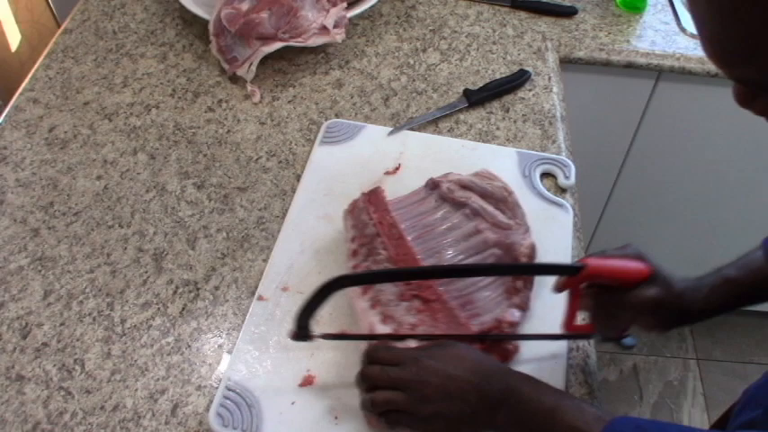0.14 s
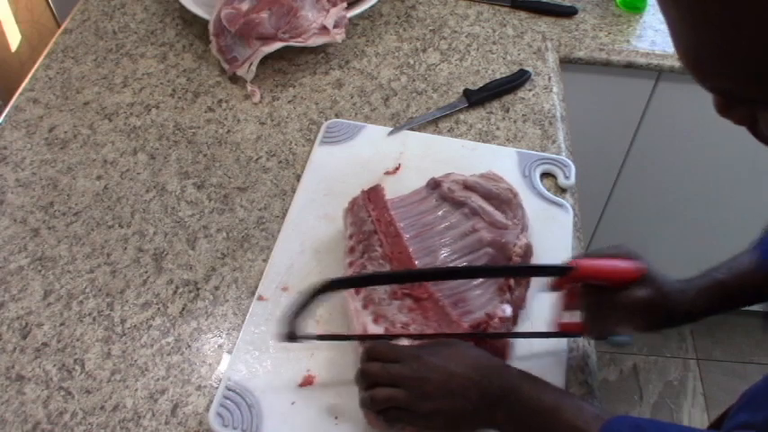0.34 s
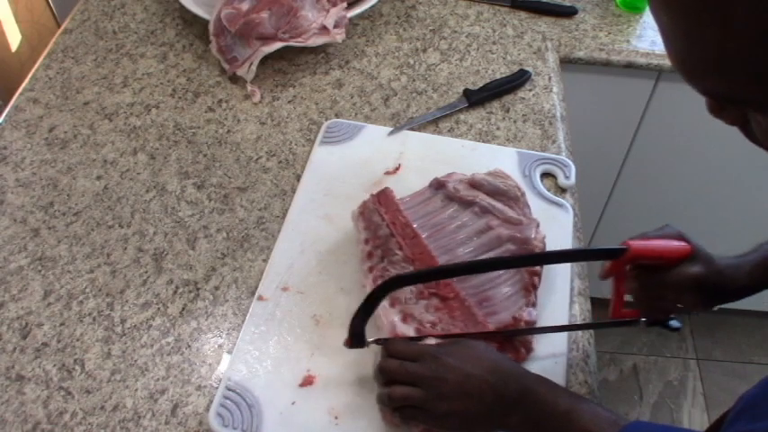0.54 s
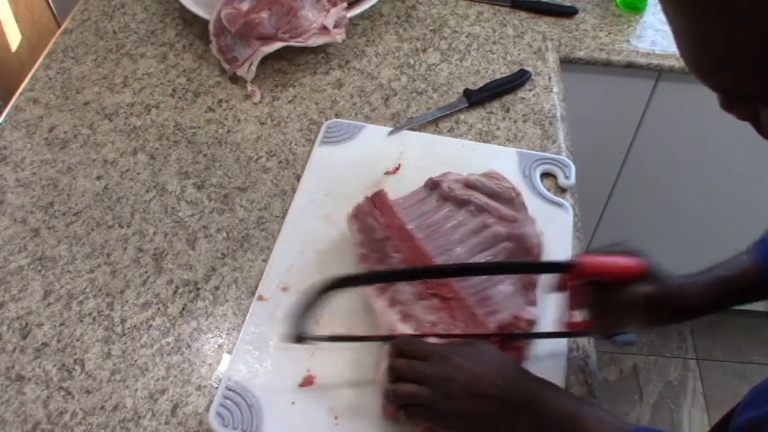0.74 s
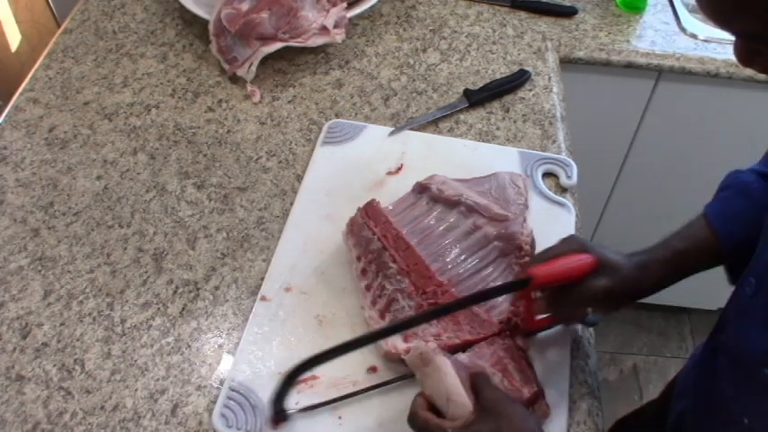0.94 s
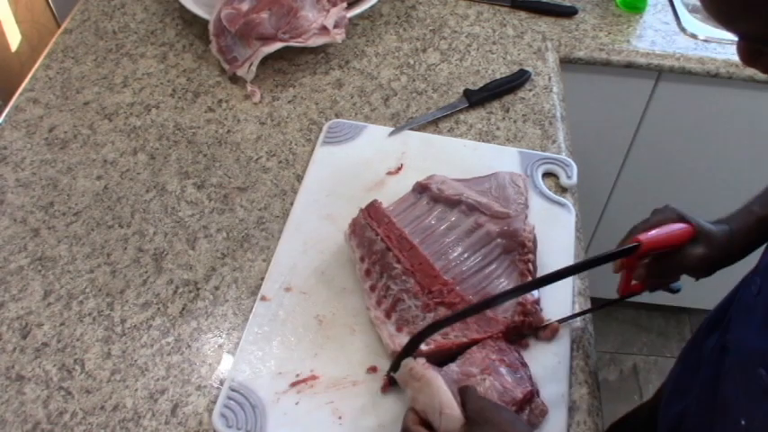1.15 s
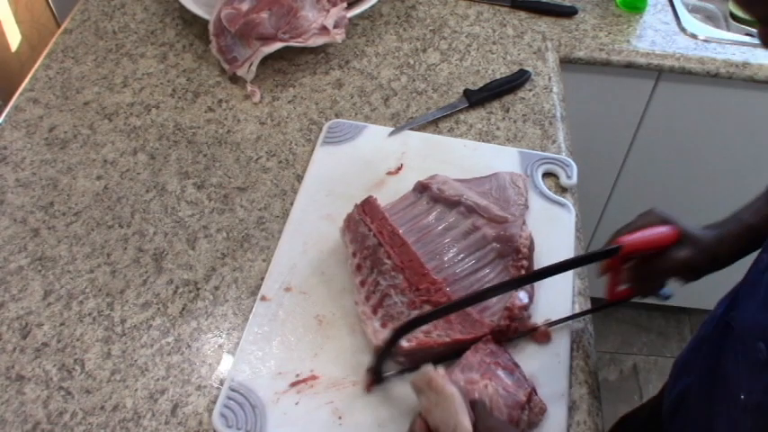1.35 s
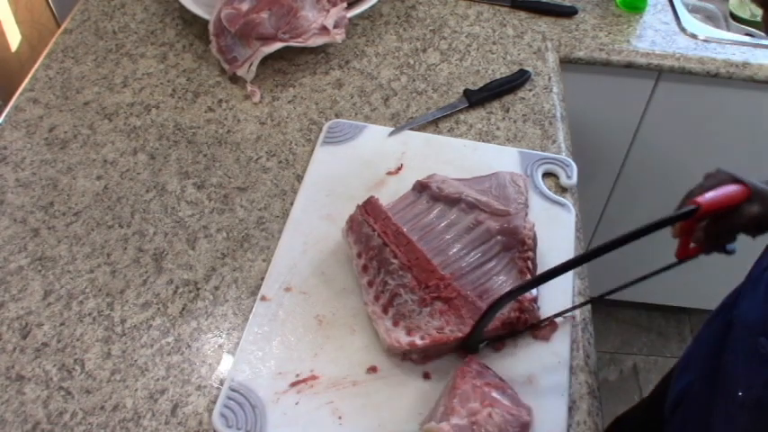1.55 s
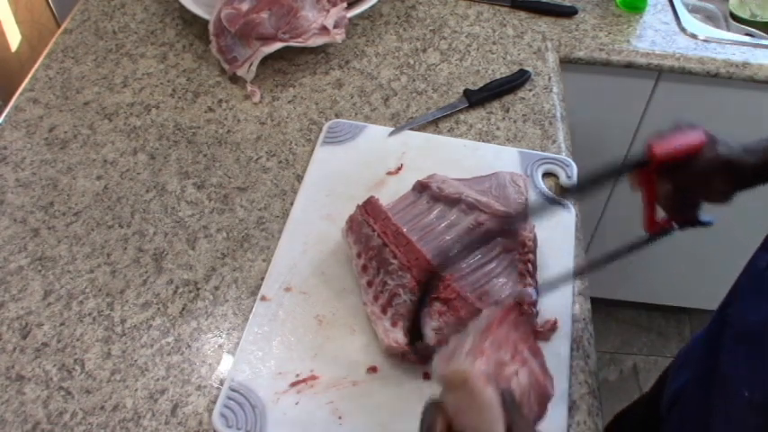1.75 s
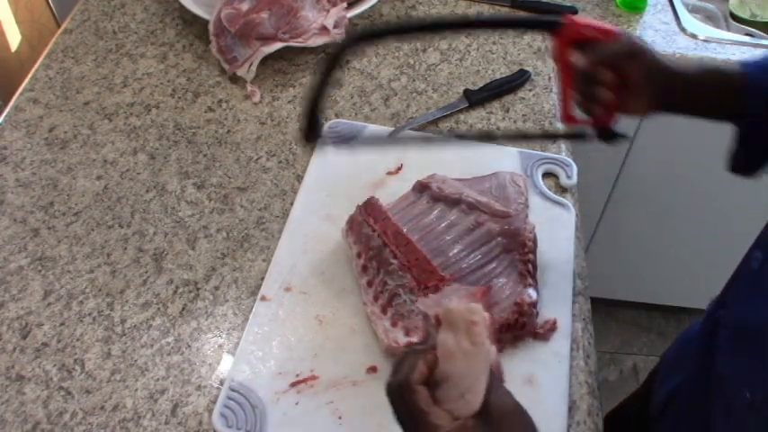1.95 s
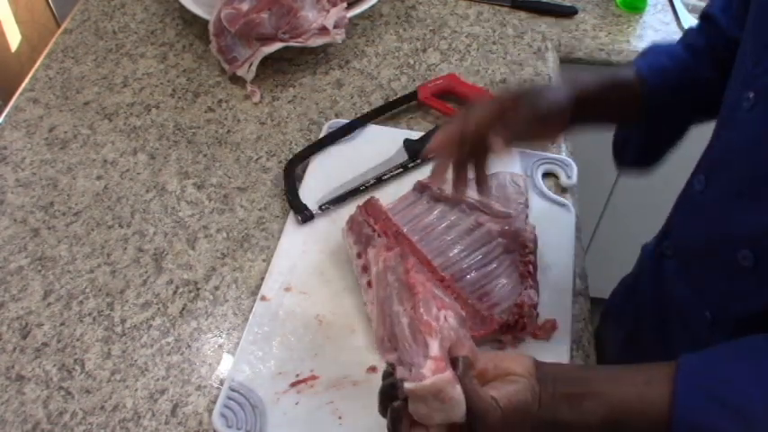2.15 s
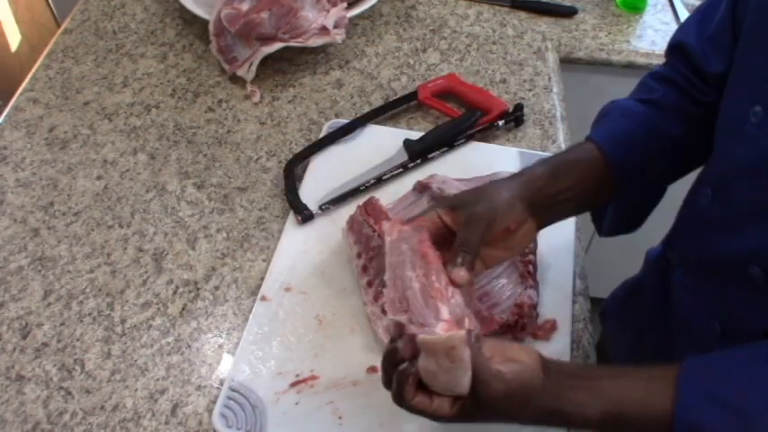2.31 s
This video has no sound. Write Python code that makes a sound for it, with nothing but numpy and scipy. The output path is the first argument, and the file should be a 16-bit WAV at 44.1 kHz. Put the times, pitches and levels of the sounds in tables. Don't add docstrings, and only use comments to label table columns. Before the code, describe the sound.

A hacksaw saws bone, heard close in a hard-walled kitchen. From 0 to 0.8 s, six quick light strokes rasp with short rising squeals. An abrupt cut brings heavier, lower strokes around 0.95-1.55 s, knocking the hollow board. A small click frees the blade at 1.65 s, then near quiet. At 2.08 s the saw clatters down, bounces and rattles; faint wet clicks end over soft room tone.

```python
import sys
import numpy as np
from scipy import signal
from scipy.fft import rfft, irfft
from scipy.io import wavfile

SR = 44100
rng = np.random.default_rng(int(sys.argv[2]) if len(sys.argv) > 2 else 0)


def persist_wave(psi):
    counts = np.round(np.clip(psi, -1, 1) * 32767).astype(np.int16)
    wavfile.write(sys.argv[1], SR, np.atleast_2d(counts).T)


def gain_from_db(level_db):
    decades = np.asarray(level_db, float) / 20
    return 10 ** decades


N = 109191
T = np.arange(N) / SR
CHANGE_S = 0.8165
# centre in Hz, width in Hz, level in dB.
BOARD_MODES = [(185, 34.8, -20), (280, 54, -7.5), (374, 54, -3), (467, 62, 0), (601, 73, -2),
               (740, 64, -0.5), (948, 31, -2), (1050, 58, -1), (1252, 32, -6.5), (1358, 48, -2.5),
               (1570, 307, -9.5), (2180, 630, -17.5)]


def rms_one(x):
    return x / np.sqrt(np.mean(x ** 2) + 1e-20)


def at_hz(points, hz):
    table_hz, value = np.transpose(points)
    return np.interp(np.log(hz + 1), np.log(table_hz), value)


def colour(x, spectrum):
    gain = gain_from_db(at_hz(spectrum, np.fft.rfftfreq(N, 1 / SR)))
    return rms_one(irfft(rfft(x) * gain, N))


def drift(rate_hz):
    r = np.exp(-2 * np.pi * rate_hz / SR)
    noise = rng.standard_normal(N + SR)
    return rms_one(signal.lfilter([1], [1, -2 * r, r * r], noise)[SR:])


def body(x, peaks):
    out = 0
    for k, (hz, width_hz, db) in enumerate(peaks):
        r = np.exp(-np.pi * width_hz / SR)
        feed = [(1 - r * r) / 2, 0, (r * r - 1) / 2]
        back = [1, -2 * r * np.cos(2 * np.pi * hz / SR), r * r]
        out = out + (-1) ** k * gain_from_db(db) * signal.lfilter(feed, back, x)
    return out


def broad_mode(x, hz, width_hz):
    mode = [(hz, width_hz, 0)]
    return body(body(x, mode), mode)


def ring(clicks, hz, t60_s):
    r, w = gain_from_db(-60 / (t60_s * SR)), 2 * np.pi * hz / SR
    return signal.lfilter([0, np.sin(w)], [1, -2 * r * np.cos(w), r * r], clicks + 1e-18)


def grains(rate_per_s, spread_db):
    hits = rng.random(N) < rate_per_s / SR
    size = gain_from_db(spread_db * np.minimum(rng.exponential(1, N), 4))
    return hits * size * rng.choice([-1, 1], N)


def saw(strokes, peak_at, swell, jitter, grit, peaks, chip_spectrum):
    # centre in Hz, width in Hz, level in dB.
    blade_modes = [(3900, 390, 21), (4300, 190, -15), (5000, 220, 21), (5840, 100, -7), (7000, 140, 4),
                   (8500, 590, -11)]
    blade_db, chatter_db = -23, 1
    chips_per_s, bites_per_s, chip_spread_db = 16000, 2500, 2.5
    start_rate = 0.6
    rasp_swell = 1.9

    rasp, knock, rate_hz = np.zeros(N), np.zeros(N), np.full(N, 300.)
    for start_s, length_s, rasp_db, tooth_db, top_hz in strokes:
        u = np.interp(T, [start_s, start_s + peak_at * length_s, start_s + length_s], [0, 0.5, 1])
        speed = np.maximum(np.sin(np.pi * u), 0) * (u < 1)
        rasp += gain_from_db(rasp_db) * speed ** (swell * rasp_swell)
        knock += gain_from_db(tooth_db) * speed ** swell
        rise = np.sin(np.pi / 2 * np.minimum(1.4 * u, 1))
        rate_hz = np.where(T > start_s, top_hz * (start_rate + (1 - start_rate) * rise), rate_hz)

    phase = np.cumsum(rate_hz * (1 + jitter * drift(250))) / SR
    strikes = np.diff(np.floor(phase), prepend=0) > 0
    teeth = strikes * gain_from_db(1.9 * rng.standard_normal(N))
    teeth = rms_one(teeth - teeth.mean()) + grit * rms_one(grains(bites_per_s, chip_spread_db))
    chips = colour(grains(chips_per_s, chip_spread_db), chip_spectrum)
    chips = rms_one(chips + gain_from_db(blade_db) * rms_one(body(chips, blade_modes)))
    knocking = knock * gain_from_db(chatter_db * drift(15)) * rms_one(body(teeth, peaks))
    return knocking + rasp * gain_from_db(0.45 * drift(90)) * chips


def light_strokes():
    # start in s, length in s, rasp in dB, teeth in dB, fastest tooth rate in Hz.
    strokes = [
        (-.04, .11, -23.5, -29, 852),
        (.17, 0.11, -30, -32, 848.3),
        (.30, 0.12, -23.5, -27.5, 701.2),
        (.47, 0.094, -25.5, -28.5, 880),
        (.60, .125, -22, -30, 799),
        (.745, 0.11, -22.5, -28, 1023),
    ]
    # centre in Hz, width in Hz, level in dB.
    bone_modes = [(254, 144, -9.5), (400, 196, -1.5), (630, 152, 3.5), (880, 400, -1), (1480, 60, -5),
                  (2000, 140, -6), (2410, 220, -16)]
    # frequency in Hz, density in dB per Hz.
    chip_spectrum = [(880, -7), (1500, -0.5), (2090, 3), (2830, -4.5), (3910, -1), (6500, -2), (7090, 3),
                     (15500, -26)]
    return saw(strokes, peak_at=0.5, swell=0.47, jitter=0.2, grit=0.98,
               peaks=bone_modes, chip_spectrum=chip_spectrum)


def heavy_strokes():
    # start in s, length in s, rasp in dB, teeth in dB, fastest tooth rate in Hz.
    strokes = [
        (.70, 0.098, -63, -33, 448.8),
        (.955, .2, -30, -14.5, 478),
        (.985, .16, -27.5, -29, 519.7),
        (1.175, 0.145, -26, -24, 538.2),
        (1.352, .1, -28.5, -22.5, 430.1),
        (1.385, 0.14, -37.5, -18, 480.6),
        (1.59, 0.13, -55, -45.5, 400),
    ]
    # frequency in Hz, density in dB per Hz.
    chip_spectrum = [(1000, -27), (1800, -1), (2800, -8.5), (4400, -12.5), (5800, -11), (7500, -10),
                     (10500, -24), (15500, -44)]
    return saw(strokes, peak_at=0.45, swell=0.79, jitter=0.3, grit=1.36,
               peaks=BOARD_MODES, chip_spectrum=chip_spectrum)


def bites():
    # time in s, level in dB.
    catches = [(.964, -26), (0.977, -21), (.991, -21), (1.025, -16), (1.028, -2), (1.045, -2), (1.0775, 0),
               (1.087, 5), (1.112, -13), (1.362, -6), (1.408, -18), (1.424, -14), (1.444, -18), (1.471, -3),
               (1.489, -8), (1.527, -13), (1.545, -9), (1.611, -26)]
    gain_db = 20
    knocks = np.zeros(N)
    for s, db in catches:
        knocks[int(s * SR)] = -gain_from_db(db + gain_db)
    return body(knocks + 1e-18, BOARD_MODES)


def squeal():
    # start in s, length in s, level in dB, first rate in Hz, last rate in Hz.
    glides = [
        (.005, 0.051, -19.5, 700.6, 890.4),
        (0.046, 0.06, -29.5, 801.6, 813.2),
        (.185, .1, -27.5, 752.5, 856.2),
        (.33, 0.11, -36, 657.6, 630),
        (.488, 0.036, -26.5, 579, 740),
        (.518, 0.076, -29, 756.7, 870),
        (0.759, 0.057, -18, 621.3, 998.5),
        (1.2, 0.11, -31.5, 1077, 1090),
        (1.4, 0.04, -11, 431, 490),
    ]
    wander, flutter_db = 0.032, 3
    octave_db, octave_db_per_khz = -3.5, 101

    level, rate_hz = np.zeros(N), np.full(N, 600.)
    for start_s, length_s, db, first_hz, last_hz in glides:
        u = np.clip((T - start_s) / length_s, 0, 1)
        level += gain_from_db(db) * np.sin(np.pi * u) * (u < 1)
        rate_hz = np.where(T > start_s, first_hz + (last_hz - first_hz) * np.sqrt(u), rate_hz)
    phase = 2 * np.pi * np.cumsum(rate_hz * (1 + wander * drift(157.4))) / SR
    growth_db = octave_db_per_khz * (np.minimum(rate_hz, 1000) - 900) / 1000
    octave = gain_from_db(octave_db + growth_db + flutter_db * drift(190)) * np.sin(2 * phase)
    note = gain_from_db(flutter_db * drift(153)) * np.sin(phase)
    return level * (note + octave * (T < CHANGE_S))


def laid_down():
    # time in s, level in dB, softness cut in Hz, board share in dB.
    contacts = [(2.0559, -28.5, 900, 18.5), (2.08, -34, 9000, -18), (2.0864, 0.5, 5800, -35),
                (2.0955, -8, 4000, -1), (2.104, -12, 4000, -29), (2.108, -4, 3020, -5.5),
                (2.113, -11.5, 3000, -4.5), (2.122, -13.5, 3000, -12), (2.1355, -7, 2000, -8.5),
                (2.15, -18, 4000, -2), (2.163, -19, 3000, -2), (2.183, -21, 5030, 12.5),
                (2.2, -22, 4000, 5.5), (2.232, -30, 1500, 3)]
    # frequency in Hz, level in dB, t60 in s.
    frame_modes = [(260.4, -10, 0.058), (391, -10.5, 0.038), (770, -10, 0.058), (870, -15, 0.045),
                   (1010, -9.5, 0.052), (1070, -12, 0.085), (1234, -15, 0.026), (1584, -16.5, 0.022),
                   (1640, -23, 0.013), (3330, -20, .012), (5800, -13, 0.018), (7200, -12, 0.02),
                   (8700, -16.5, .012), (9350, -25, .014)]
    # frequency in Hz, density in dB per Hz.
    crack_spectrum = [(200, -14), (700, 3.5), (1400, 3), (3500, -6), (4600, -13), (7000, -7.5),
                      (11000, -20), (15000, -35)]
    board_below_hz = 1100
    rattle_db, rattle_t60_s, rattles_per_s = -21.5, 0.43, 500
    crack_db, crack_t60_s = -14, 0.081
    slide_db, slide_t60_s = -31.5, 0.83
    slap_hz, slap_width_hz, slap_db = 1280, 560, 27.5

    def dying(s, db, t60_s):
        return gain_from_db(db - 60 * np.maximum(T - s, 0) / t60_s)

    touch_s, impact_s = contacts[0][0], contacts[2][0]
    out = np.zeros(N)
    luck_db = rng.normal(0, 1.0, (len(contacts), len(frame_modes)))
    rattle = grains(rattles_per_s, 5.56) * dying(impact_s, rattle_db, rattle_t60_s) * (T > impact_s)
    for k, (hz, db, t60_s) in enumerate(frame_modes):
        clicks = rattle * rng.uniform(0, 1, N) * gain_from_db(db)
        below = np.clip(np.log2(board_below_hz / hz), 0, 1)
        for (s, hit_db, cut_hz, low_db), extra_db in zip(contacts, luck_db[:, k]):
            hit = gain_from_db(hit_db + db + extra_db + low_db * below)
            clicks[int(s * SR)] += hit / (1 + (hz / cut_hz) ** 2)
        out += (-1) ** k * ring(clicks, hz, t60_s)

    burst = dying(touch_s, slide_db, slide_t60_s) * (T > touch_s)
    slaps = np.zeros(N)
    for s, hit_db, cut_hz, _ in contacts:
        burst += dying(s, hit_db + crack_db, crack_t60_s) * (T >= s) * cut_hz / 6000
        slaps[int(s * SR)] = -gain_from_db(hit_db + slap_db) / (1 + (slap_hz / cut_hz) ** 2)
    out += broad_mode(slaps + 1e-18, slap_hz, slap_width_hz)
    return out + burst * colour(rng.standard_normal(N), crack_spectrum)


def clicks_and_rubs():
    # time in s, level in dB, centre in Hz, rise in s, t60 in s.
    wet_clicks = [(.877, -49, 7440, .0008, .007), (.877, -50, 4500, .001, .007),
                  (.9415, -30, 1870, .0007, .006), (.9415, -42, 5500, .0005, .005),
                  (.948, -40, 5530, .0005, .01), (.98, -34, 7000, .001, .01),
                  (1.363, -36, 8500, .0009, .019), (1.497, -31, 6200, .0016, .015),
                  (1.651, -39, 3100, .001, .02), (1.651, -37, 2050, .001, .03),
                  (1.652, -41, 4800, .001, .015), (1.653, -39, 7300, .001, .012),
                  (2.056, -52, 13000, .0005, .004), (2.346, -46, 9500, .001, .012),
                  (2.3657, -37, 2060, .0007, .024), (2.368, -47, 5800, .002, .02),
                  (2.407, -45, 8600, .0015, .012), (2.416, -39, 5070, .0008, .01),
                  (2.459, -48, 7680, .002, .012)]
    # time in s, level in
    # dB, centre in Hz, rise in s, t60 in s.
    rubs = [(.002, -24, 535, 0.018, 0.12), (.008, -14.5, 815, 0.032, 0.044), (.151, -33, 1780, .004, .066),
            (0.314, -27, 2100, 0.017, 0.15), (.36, -33.5, 1480, 0.034, 0.21),
            (.625, -27.5, 2010, 0.03, .25), (.65, -30, 1480, 0.034, 0.15), (0.955, -22, 185, 0.04, 0.18),
            (1.06, -14.5, 740, .02, .2), (1.271, -42.5, 185, 0.021, 0.34), (1.05, -22, 1380, .04, 0.2),
            (1.36, -25.5, 400, .01, .3), (1.402, -15, 453, .005, 0.23), (1.41, -19.5, 1070, 0.033, 0.24),
            (1.435, -19.5, 416, 0.053, 0.089), (1.52, -27.5, 793, 0.017, 0.21),
            (1.59, -38, 1233, 0.026, 0.14), (1.63, -36, 297, 0.019, 0.12), (1.64, -37, 423, .012, 0.12),
            (1.655, -38.5, 3200, 0.0097, 0.14), (2.345, -52.5, 8200, .0043, 0.34),
            (2.35, -59, 13000, .01, .2), (2.36, -51.5, 4340, .012, 0.27)]
    # frequency in Hz, level in dB, t60 in s.
    freed_modes = [(2900, -38, .008), (3300, -40, .015), (2100, -36, .01)]
    freed_s = 1.6515

    out, noise = np.zeros(N), rng.standard_normal(N)
    for s, db, hz, rise_s, t60_s in wet_clicks + rubs:
        decay = gain_from_db(db - 60 * np.maximum(T - s - rise_s, 0) / t60_s)
        shape = np.clip((T - s) / rise_s, 0, 1) * decay
        out += shape * rms_one(broad_mode(noise, hz, 0.22 * hz))
    freed = np.arange(N) == int(freed_s * SR)
    for hz, db, t60_s in freed_modes:
        out += ring(gain_from_db(db) * freed, hz, t60_s)
    return out


def kitchen(x):
    # frequency in Hz, t60 in s.
    decay_times = [(150, 0.82), (1000, 0.36), (4000, 0.56), (12000, 0.41)]
    echo_db, first_echo_s = -7, 0.0038
    t, echo = T[:SR], 0
    for low_hz in 60 * 2. ** np.arange(8):
        octave = signal.butter(2, [low_hz, 2 * low_hz], "band", fs=SR, output="sos")
        band = signal.sosfilt(octave, rng.standard_normal(SR))
        echo = echo + band * gain_from_db(-60 * t / at_hz(decay_times, 2.0 * low_hz))
    echo = echo * (t > first_echo_s)
    echo = echo / np.sqrt(np.sum(echo ** 2))
    return x + gain_from_db(echo_db) * signal.fftconvolve(x, echo)[:N]


def room_tone():
    # frequency in Hz, density in dB per Hz.
    air_spectrum = [(15, -65), (25, -37), (110, -21), (200, -22), (227, -5), (365, -17), (436, -10),
                    (546, -11), (10000, -41), (13000, -75), (22000, -120)]
    air_db, hum_hz, hum_db = -45.5, 127, -70
    air = gain_from_db(air_db + 1.0 * drift(5.7)) * colour(rng.standard_normal(N), air_spectrum)
    return air + gain_from_db(hum_db) * np.sin(2 * np.pi * hum_hz * T)


def scene():
    near = squeal() + clicks_and_rubs()
    before = kitchen(light_strokes() + near * (T < CHANGE_S))
    after = kitchen(heavy_strokes() + bites() + laid_down() + near * (T > CHANGE_S))
    fade = np.clip((T - CHANGE_S) / 0.000392, 0, 1)
    low_cut = signal.butter(6, 160, "high", fs=SR, output="sos")
    mix = signal.sosfilt(low_cut, before * (1 - fade) + after * fade)
    return (mix + room_tone())[None]


def top_cut(x):
    return signal.sosfilt(signal.butter(12, 15700, fs=SR, output="sos"), x)


def record(dry):
    mic_top_hz, hiss_db = 10500, -67
    hissy = dry + gain_from_db(hiss_db) * rng.standard_normal(N)
    dull = signal.sosfilt(signal.butter(2, mic_top_hz, fs=SR, output="sos"), hissy)
    return top_cut(dull / (1 + np.abs(dull) ** 20) ** (1 / 20))


dry = scene()
out = record(dry)
persist_wave(out)
```